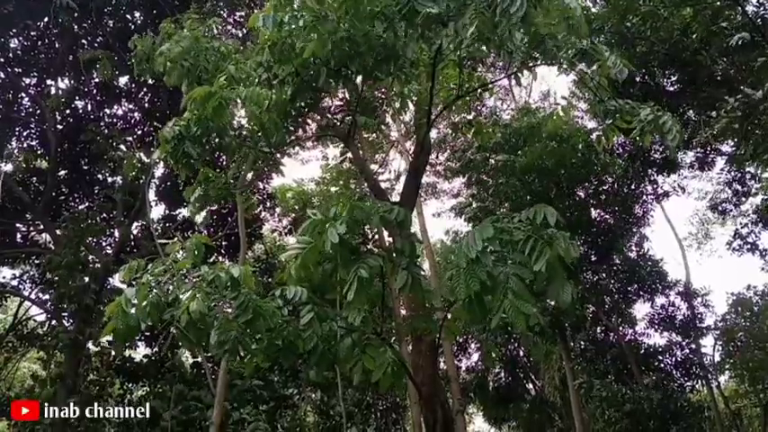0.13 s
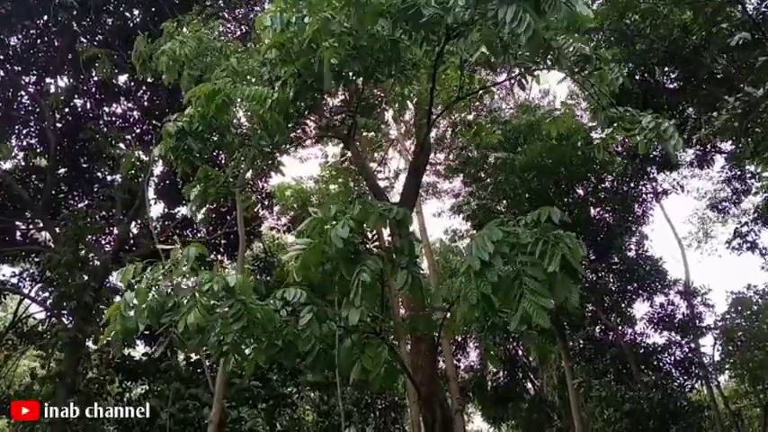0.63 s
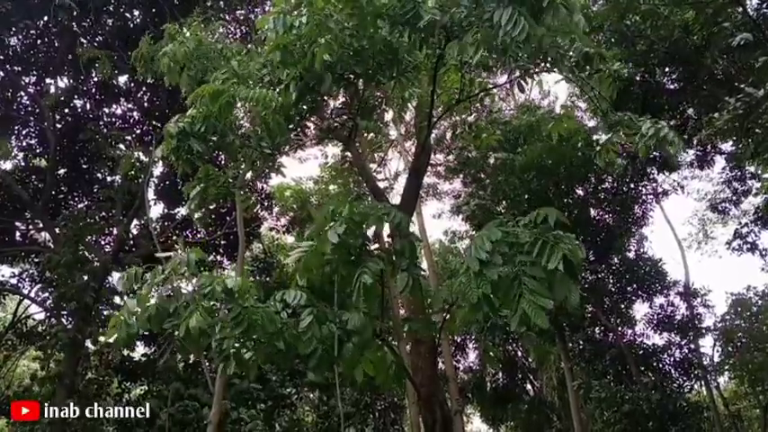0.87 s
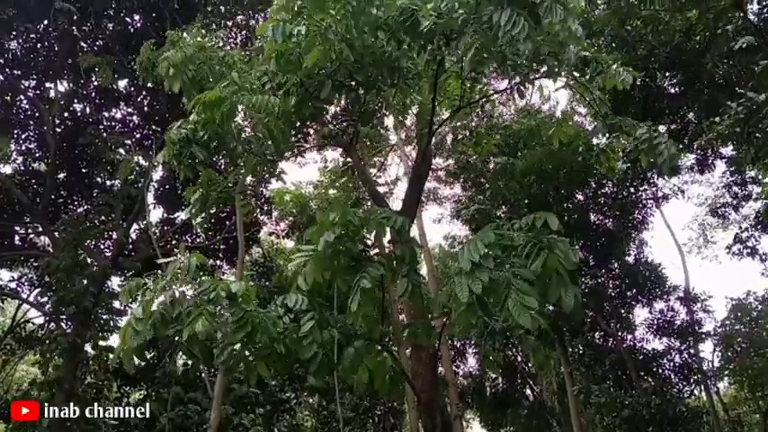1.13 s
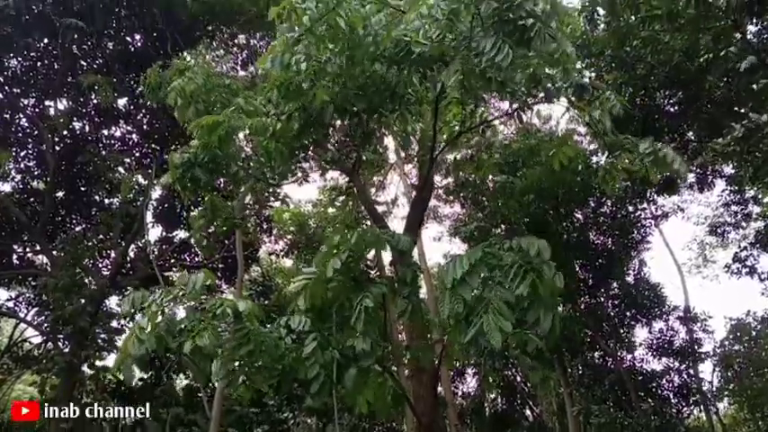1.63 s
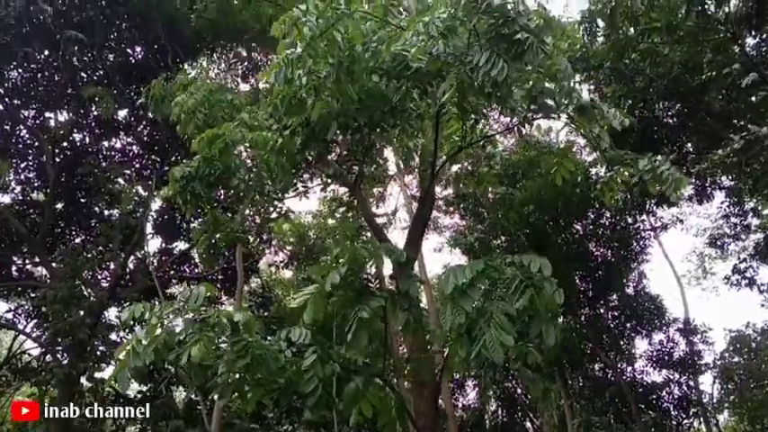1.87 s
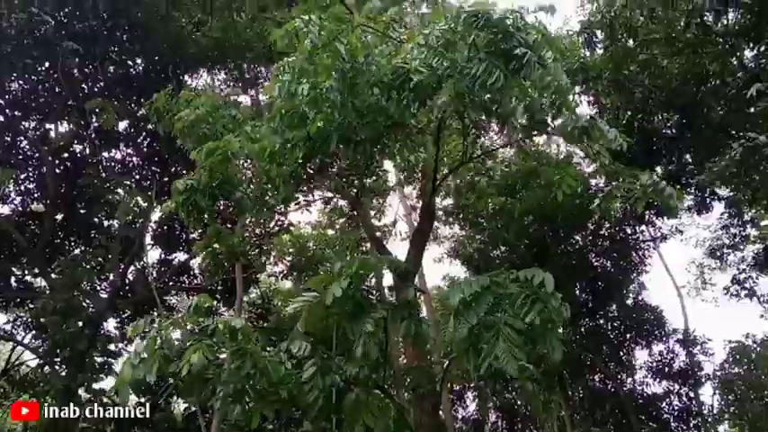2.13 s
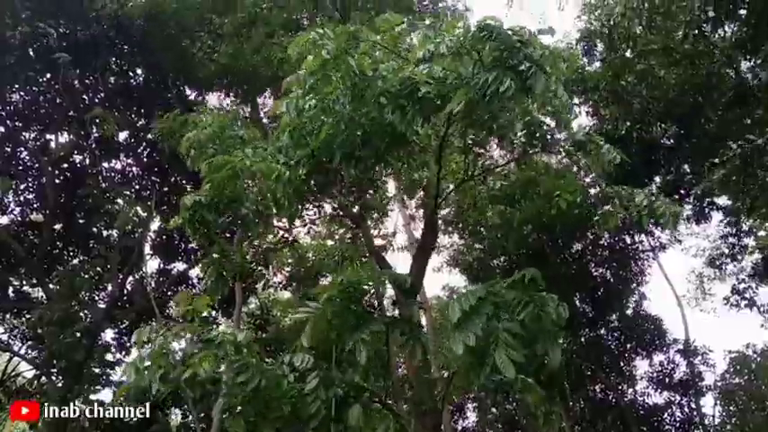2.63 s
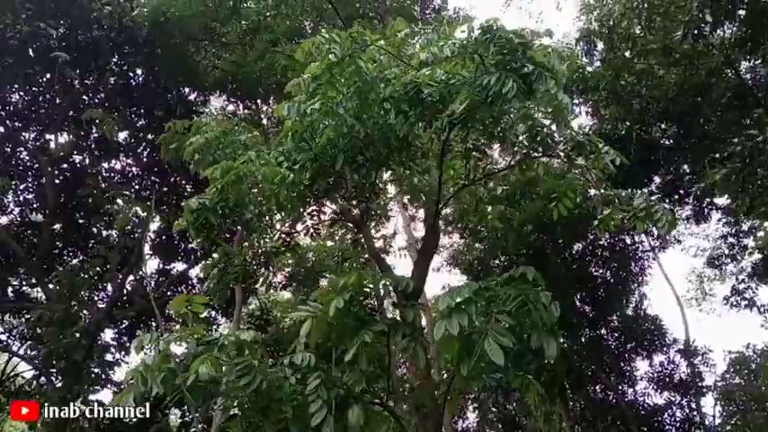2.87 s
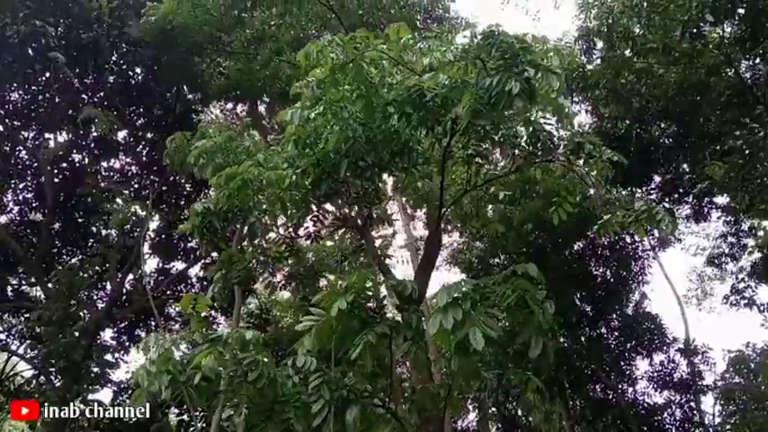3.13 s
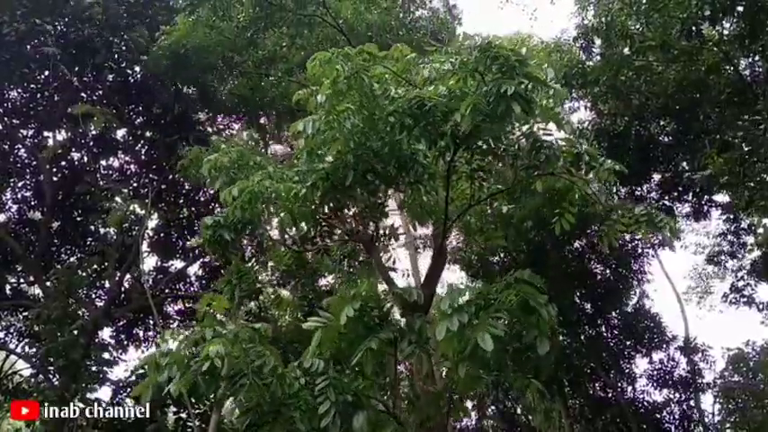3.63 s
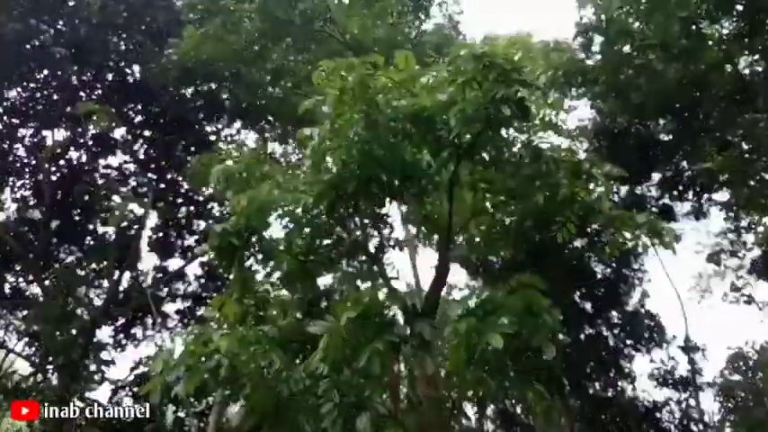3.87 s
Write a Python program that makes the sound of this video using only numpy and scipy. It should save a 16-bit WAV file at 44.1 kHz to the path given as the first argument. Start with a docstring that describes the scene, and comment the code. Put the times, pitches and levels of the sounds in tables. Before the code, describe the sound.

A chainsaw cuts at full throttle, a raspy, slightly wavering buzz with chain hiss and metallic bar ringing. Near 1.2 s it revs up briefly, is released, and slides down in pitch, growing duller and fainter, sputtering from 2.8 s as tiny fibre ticks begin. At 3.2 s it stops. Sharp, irregular trunk cracks continue to 4 s over soft rustle, faint idle thumps and two dull knocks. Dry, centred, outdoors.

```python
"""Chainsaw and splitting trunk

A two-stroke chainsaw cuts at full throttle in a wood, revs free, is let go and coasts down to a stop.
Sine waves at multiples of the shaft speed make the exhaust; faint idle thumps are filtered pulses.
Coloured noise makes the hiss of the chain and the ringing of the bar, and the rustle that stays.
Then the trunk splits: short noise bursts make sharp dry cracks. Both channels are alike."""
import sys
import numpy as np
from scipy import signal
from scipy.fft import rfft, irfft, next_fast_len
from scipy.io import wavfile
from scipy.ndimage import uniform_filter1d

SR = 44100
rng = np.random.default_rng(int(sys.argv[2]) if len(sys.argv) > 2 else 0)


def inscribe(sig):
    """Save sig as 16-bit PCM at rate SR to the path in sys.argv[1].

    A 1-D sig is mono; a 2-D sig holds one channel per row.
    Samples are clipped to [-1, 1] before scaling.
    """
    pcm = np.round(np.clip(np.atleast_2d(sig).T, -1, 1) * 32767)
    wavfile.write(sys.argv[1], SR, pcm.astype(np.int16))


def undo_db(level):
    """Turn decibels back into plain size, where 20 dB means ten times bigger."""
    steps = np.asarray(level, float) / 20
    return 10 ** steps


N = 176400  # samples: 4 s
T = np.arange(N) / SR
HZ = np.fft.rfftfreq(next_fast_len(N + 8192), 1 / SR)

STOP_S = 3.2  # the exhaust fades out and the chain stops
WAVER_DB = 3.5  # unsteadiness of the exhaust harmonics and of the slow bar
SPUTTER_S, SPUTTER_TAKES_S = 2.8, 0.25  # the slow shaft begins to turn unevenly


def unit(x):
    """Scale to rms 1."""
    return x / np.sqrt(np.mean(x ** 2) + 1e-20)


def along(points, hz):
    """Read a (frequency [Hz], level [dB]) table on a log frequency axis."""
    f, level_db = np.transpose(points)
    return np.interp(np.log(hz + 1), np.log(f + 1), level_db)


def curve(rows):
    """Draw a (time [s], value) table as one value per sample."""
    s, value = np.transpose(rows)
    return np.interp(T, s, value)


def wobble(rate_hz):
    """A random curve: straight lines between random points, rate_hz points a second."""
    count = int(4 * rate_hz) + 2
    return np.interp(T * rate_hz, np.arange(count), rng.standard_normal(count))


def step(at_s, takes_s):
    """A smooth change from 0 to 1."""
    return 0.5 + 0.5 * np.tanh((T - at_s) / takes_s)


def filtered(x, response):
    """Multiply the spectrum of x by a response on the grid HZ."""
    size = 2 * (len(HZ) - 1)
    return irfft(rfft(x, size) * response, size)[:N]


def ringing(modes):
    """Causal response of resonances, which ring on after a push; signs alternate from mode to mode."""
    response = 0
    for k, (center, width, db) in enumerate(modes):
        resonance = 1j * HZ * width / (center ** 2 - HZ ** 2 + 1j * HZ * width)
        response = response + (-1) ** k * undo_db(db) * resonance
    return response


def noise(response):
    """Coloured noise of rms 1."""
    return unit(filtered(rng.standard_normal(N), response))


# How fast the crankshaft turns: (time [s], speed [Hz])
SHAFT = [(0, 172.2), (0.231, 177.7), (0.478, 174.4), (.97, 175), (1.22, 187.9), (1.35, 168.8),
         (1.76, 122.2), (2.21, 86.73), (2.57, 64.75), (2.82, 53.3), (3.25, 41.35)]


def crankshaft():
    """Speed and angle of the shaft: the angle adds up the speed, plus a small random drift."""
    s, hz = np.transpose(SHAFT)
    shaft_hz = np.exp(np.interp(T, s, np.log(hz)))
    drift_rad = 0.021 + 0.07 * step(SPUTTER_S, SPUTTER_TAKES_S)  # grows as the shaft sputters
    angle = 2 * np.pi * np.cumsum(shaft_hz) / SR + drift_rad * wobble(30)
    return shaft_hz, angle


# Loudness of the hiss, before the pulsing and the bar: (time [s], level [dB])
CHAIN = [(0, -26.5), (1.2, -27), (1.55, -28.5), (2, -31.5), (2.4, -34.5), (2.7, -35), (3.1, -41.5),
         (4, -38.5)]
# Colour of the hiss while cutting, relative levels: (frequency [Hz], level [dB])
CUTTING = [(30, -30), (130, -16), (400, -21.5), (1700, -13), (2100, -9.5), (6300, -10.5), (7800, -20.5),
           (10000, -17), (15600, -29.5)]
# Colour of the hiss while the chain runs free, relative levels: (frequency [Hz], level [dB])
RUNNING = [(30, -27), (300, -13), (800, -6.5), (4700, -5.5), (6000, -1), (7600, -10.5), (10000, -10.5),
           (13000, -21.5), (15000, -17)]
# Colour of the rustle once the chain has stopped, relative levels: (frequency [Hz], level [dB])
RUSTLE = [(60, -3), (600, -9), (1350, -22), (3700, -11.5), (6300, -8.5), (8500, -15), (13000, -26)]
# Ringing of the bar in the cut, relative levels: (frequency [Hz], width [Hz], level [dB])
BAR_CUT = [(3516, 58, 3), (4816, 49, -3.5)]
# Ringing of the bar as the chain slows, relative levels: (frequency [Hz], width [Hz], level [dB])
BAR_SLOW = [(2910, 130, -2), (3620, 300, -1), (5710, 300, 0), (8130, 160, -6), (12200, 160, -12)]


def chain(angle):
    """Chain, chips and leaves hiss as coloured noise and the bar rings; the colours cross-fade."""
    slow = step(1.61, 0.2)
    stop = step(STOP_S, 0.042)
    running_slow = slow * (1 - stop)

    # Bar levels are over the hiss
    bar_cut = undo_db(-4.5) * (1 - step(1.51, 0.04)) * noise(ringing(BAR_CUT))
    cut = noise(undo_db(along(CUTTING, HZ))) + bar_cut

    humps = sum(undo_db(db) / (1 + (2 * (HZ - center) / width) ** 2) for center, width, db in BAR_SLOW)
    bar_slow = undo_db(-3 + WAVER_DB * wobble(8.08)) * step(2.49, 0.34) * noise(humps)
    run = noise(undo_db(along(RUNNING, HZ))) + bar_slow

    rustle = noise(undo_db(along(RUSTLE, HZ)))
    hiss = np.sqrt(1 - slow) * cut + np.sqrt(running_slow) * run + np.sqrt(stop) * rustle
    # Pulses once a turn, deeper while the chain runs slowly
    pulsing = 1 + (0.065 + 0.14 * running_slow) * np.cos(angle)
    return undo_db(curve(CHAIN)) * hiss * pulsing


# Loudness of the idle; all thumps end before the first time here, so they play at its level:
# (time [s], level [dB])
IDLE = [(3.33, -52), (3.35, -43), (3.51, -45), (3.55, -54), (3.6, -46), (3.89, -44), (3.93, -54)]
# Muffler resonance, passed through twice: (frequency [Hz], width [Hz], level [dB])
MUFFLER = [(155, 110, 0)]


def idle():
    """Faint thumps: pulses through the muffler, in fours, the gaps growing within each four."""
    first_s = 2.2
    catch_s = 0.11  # the idle catches every fourth turn, then slows
    gap_s, gap_grows_s = 0.023, 0.00313

    k = np.arange(28)
    turn = k % 4
    s = first_s + k // 4 * catch_s
    s = s + turn * gap_s + gap_grows_s * turn * (turn - 1) / 2
    s = s + 0.0015 * rng.standard_normal(len(k))  # uneven times
    size = undo_db(1.5 * rng.standard_normal(len(k)))  # uneven strength
    pulses = np.bincount((s * SR).astype(int), size, N + SR)[:N]
    thumps = filtered(pulses, ringing(MUFFLER) ** 2)
    return thumps / np.std(thumps[T > first_s]) * undo_db(curve(IDLE))


# Exhaust harmonics under throttle, over the exhaust level: (frequency [Hz], level [dB])
FIRING = [(172, 0.5), (360, -17.5), (520, -23.5), (565, -0.5), (700, 0), (880, -6), (1225, -16.5),
          (1410, -18), (2700, -11.5), (3500, -7), (3900, -17.5)]
# Exhaust harmonics while coasting, over the coasting level: (frequency [Hz], level [dB])
COASTING = [(60, -16.5), (150, 1.5), (200, -1), (260, -11.5), (380, -5), (700, -6.5), (800, -12),
            (2500, -10.5)]
# Lines between the harmonics, as the cut loads the engine in a three-turn pattern,
# over the exhaust level: (frequency [Hz], level [dB])
LOADED = [(117, -19), (233, -12.5), (450, -33), (640, -11.5)]
# Extra strength of the first multiples of the shaft speed while coasting: (level [dB])
COAST_ORDERS = [-2, -5, -14, -6.5, -0.5, -3]


def exhaust(shaft_hz, angle):
    """A two-stroke fires once a turn: sines at multiples of the shaft speed, coloured by throttle."""
    exhaust_db, coast_db = -30.5, -30.5  # under throttle; at release
    release_s = 1.22  # trigger let go
    coarse = slice(None, None, 32)  # levels are worked out at every 32nd sample
    since_release_s = T[coarse] - release_s
    off = step(release_s, 0.065)[coarse]
    free = step(1.23, 0.039)[coarse]  # the chain leaves the wood
    rough = step(SPUTTER_S, SPUTTER_TAKES_S)
    coast = off * undo_db(coast_db - 6 * since_release_s)  # loses 6 dB a second

    out = np.zeros(N)
    thirds = [j / 3 for j in range(2, 12) if j % 3]
    for k in list(range(1, 41)) + thirds:
        hz = k * shaft_hz[coarse]
        if k % 1:
            level = (1 - free) * undo_db(exhaust_db + along(LOADED, hz))
        else:
            weaker_db = -7 * (k > 10) * (k % 2)  # high odd multiples
            firing = undo_db(exhaust_db + along(FIRING, hz) + weaker_db)
            order_db = COAST_ORDERS[k - 1] if k <= len(COAST_ORDERS) else -3
            colour_db = along(COASTING, hz) + order_db
            colour_db = colour_db - 11 * (hz > 800) * since_release_s  # the treble dies first
            colour_db = colour_db - 9 * (hz > 250) * rough[coarse]  # the slow engine thins
            level = (1 - off) * firing + coast * undo_db(colour_db)
        # Each harmonic wavers, the lowest ones less; more when the engine sputters
        waver_db = (WAVER_DB + 1.5 * rough) * min(1, k / 4) * wobble(14)
        level = np.interp(T, T[coarse], level) * undo_db(waver_db)
        # Loosely in step, so that slow turns are heard as separate putts
        phase = 1.3 * rng.standard_normal()
        out += level * np.sin(k * angle + phase)
    return np.sqrt(2) * out * (1 - step(STOP_S, 0.0078))


# Brief drops of the background level, each ending at its time: (time [s], level [dB])
DIPS = [(3.217, -18), (3.549, -12), (3.912, -7)]


def background_dips():
    """The background, which is everything but the cracks, dips for 18 ms before three of them."""
    drop_db = sum(db * ((T > s - 0.0177) & (T < s)) for s, db in DIPS)
    return undo_db(uniform_filter1d(drop_db, size=60))


# Cracks, peak level before the bass is cut: (time [s], level [dB], pitch [Hz])
CRACKS = [(3.219, -8.5, 4960), (3.299, -14.5, 3690), (3.312, -11.5, 6050), (3.411, -15.5, 5020),
          (3.434, -11, 3420), (3.45, -16, 4870), (3.5007, -11.5, 1170), (3.5235, -11.5, 3850),
          (3.549, -9.5, 3710), (3.629, -10, 3680), (3.676, -12.5, 6330), (3.691, -10.5, 6200),
          (3.74, -11.5, 6330), (3.763, -9.5, 4650), (3.869, -11, 5250), (3.912, -12, 3820),
          (3.9293, -10, 4790), (3.9515, -10, 4500), (3.9687, -10, 6130), (3.9813, -16, 3880)]
# Colour of a crack's broad snap, relative levels: (frequency [Hz], level [dB])
SNAP = [(900, -7.5), (1500, -9), (5500, 0), (8500, -8), (16000, -30.5)]
# Dull knocks, starting level: (time [s], level [dB])
THUDS = [(3.587, -32), (3.809, -26.5)]


def fiber_ticks():
    """Small fibres giving way: 100 faint random cracks a second from 2.8 s, as rows like CRACKS."""
    rows = []
    for k, (late, size, pitch) in enumerate(rng.random((120, 3))):
        db = -32 - 3.1 * np.log(size + 0.022)
        rows.append((2.8 + (k + late) / 100, db, 3000 + 4000 * pitch))
    return rows


def cracks():
    """Breaking wood: each crack is a noise burst with a hump at its pitch and a faint tail."""
    tearing_s = {9: 0.0032, 15: 0.0053}  # cracks that tear on, by row of CRACKS
    t = np.arange(SR // 10) / SR
    f = np.fft.rfftfreq(len(t), 1 / SR)
    out = np.zeros(N + SR)
    for k, (s, db, hz) in enumerate(list(CRACKS) + fiber_ticks()):
        length_s = tearing_s.get(k, 0.0002)
        snap = undo_db(along(SNAP, f)) * min(1, hz / 3500) ** 2  # weaker for low cracks
        ring = undo_db(-2) / (1 + ((f - hz) / (0.24 * hz)) ** 2) ** 2
        burst = unit(irfft(rfft(rng.standard_normal(len(t))) * (snap + ring), len(t)))

        attack = np.clip(t / 0.00022, 0, 1)
        blow = np.exp(-np.clip(t - length_s, 0, 1) / 0.00054)
        tail = undo_db(-11 - 60 * t / 0.028)  # falls 60 dB in 28 ms
        crack = burst * attack * (blow + tail)
        out[round(s * SR):][:len(t)] += undo_db(db) * crack / np.abs(crack).max()

    out[:N] = filtered(out[:N], 1 - 1 / (1 + (HZ / 600) ** 2))  # cut the bass
    for s, db in THUDS:
        thud = np.sin(2 * np.pi * 480 * t) * np.exp(-t / 0.0035)
        out[round(s * SR):][:len(t)] += undo_db(db) * thud
    return out[:N]


def scene():
    """Saw and splitting wood, alike on both channels."""
    shaft_hz, angle = crankshaft()
    background = chain(angle) + idle() + exhaust(shaft_hz, angle)
    background = filtered(background, HZ < 15650)  # nothing above this frequency [Hz]
    mono = background * background_dips() + cracks()
    return np.array([mono, mono])


def low_pass(x):
    """Removes everything above the highest recorded frequency."""
    return signal.sosfilt(signal.butter(12, 16690, fs=SR, output="sos"), x)


def record(dry):
    """Turn the finished mix into the sound that is written out."""
    return low_pass(dry)


dry = scene()
out = record(dry)
inscribe(out)
```